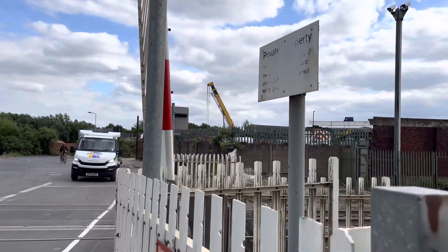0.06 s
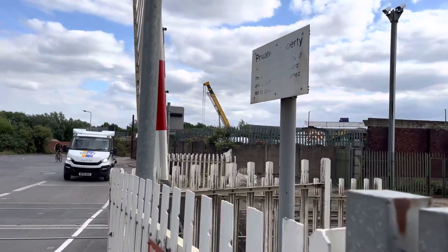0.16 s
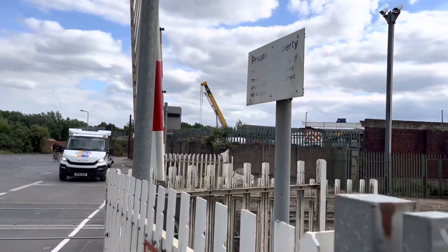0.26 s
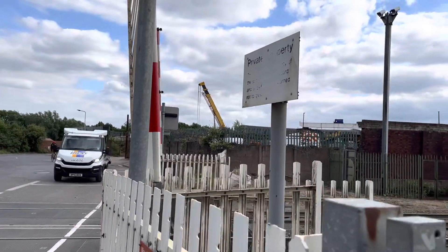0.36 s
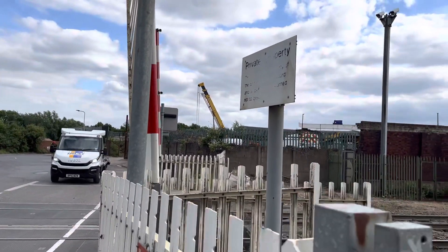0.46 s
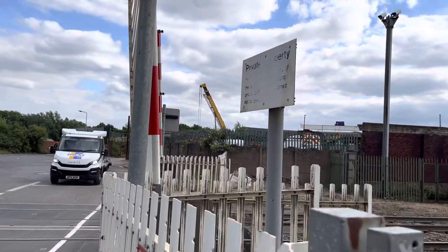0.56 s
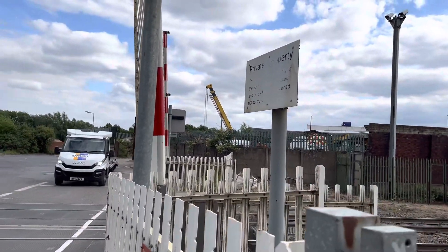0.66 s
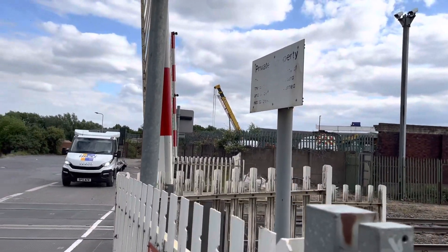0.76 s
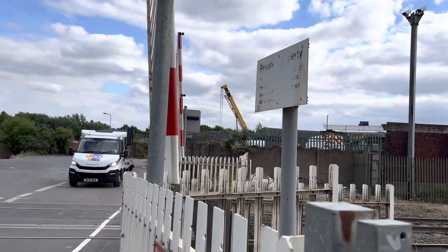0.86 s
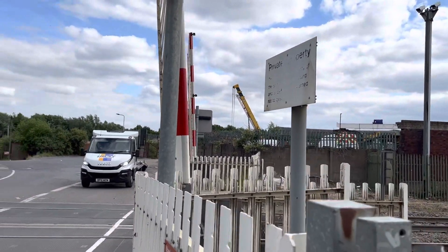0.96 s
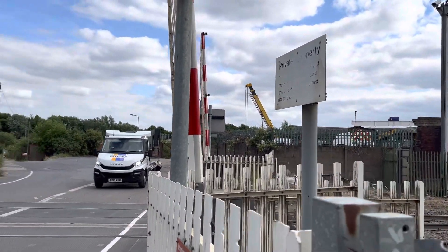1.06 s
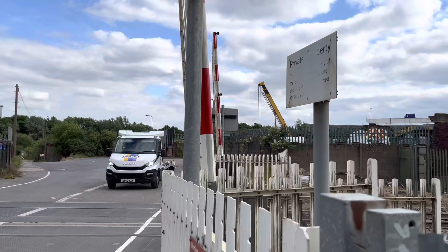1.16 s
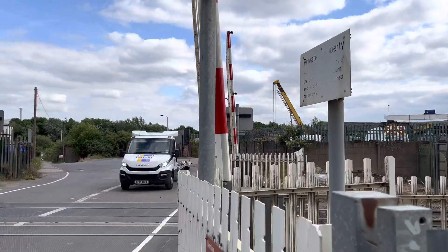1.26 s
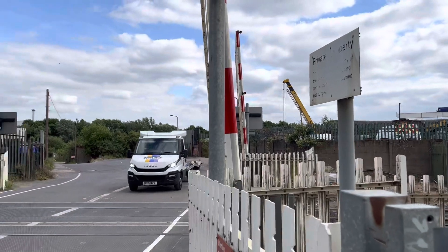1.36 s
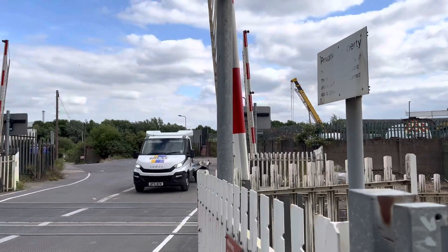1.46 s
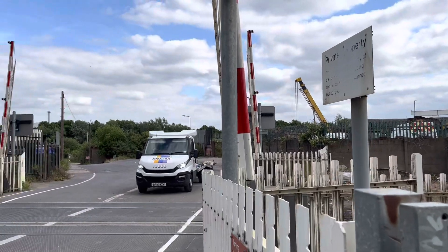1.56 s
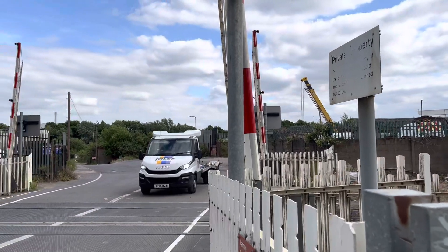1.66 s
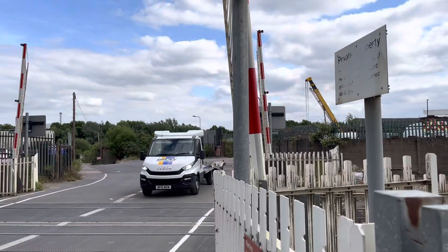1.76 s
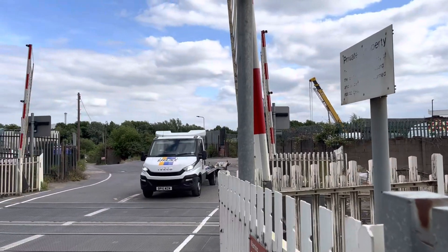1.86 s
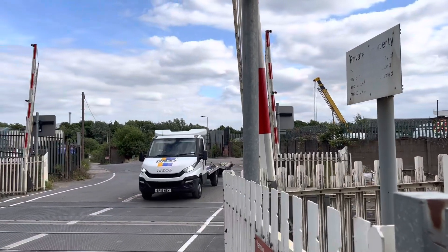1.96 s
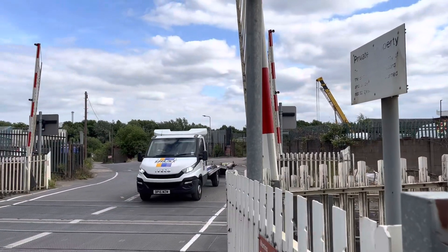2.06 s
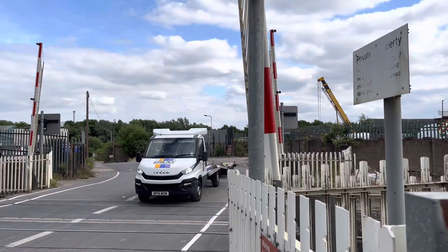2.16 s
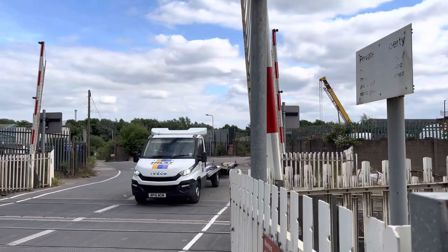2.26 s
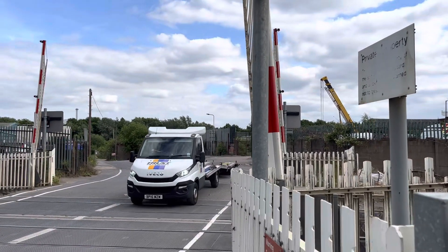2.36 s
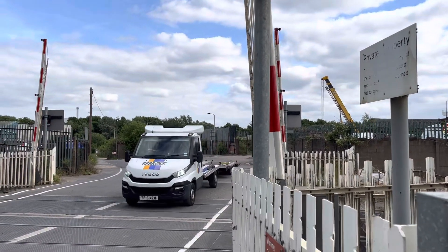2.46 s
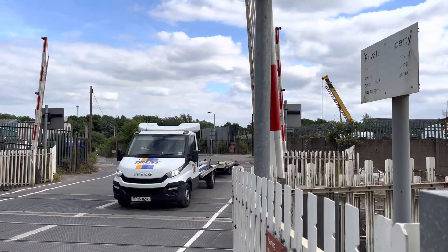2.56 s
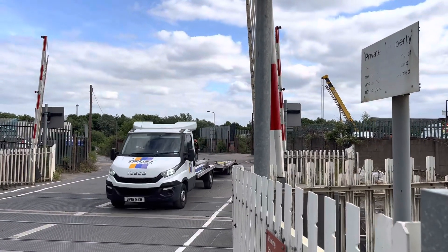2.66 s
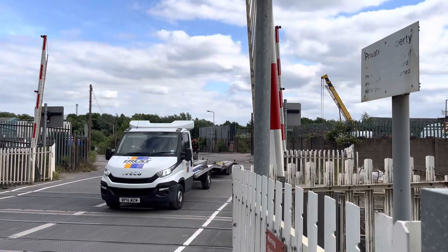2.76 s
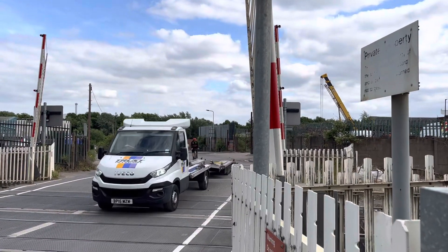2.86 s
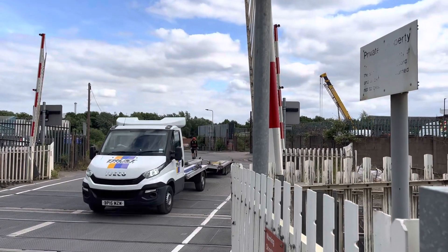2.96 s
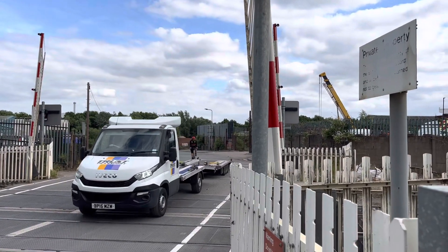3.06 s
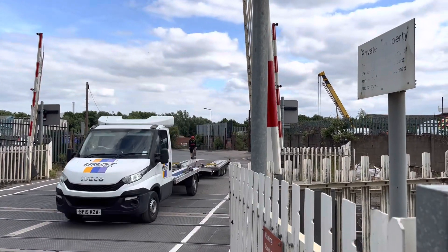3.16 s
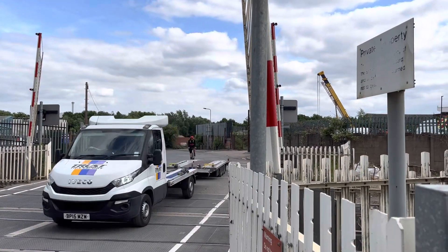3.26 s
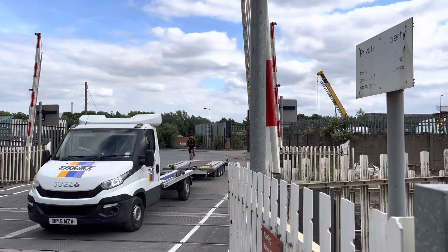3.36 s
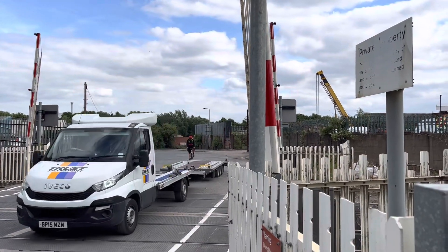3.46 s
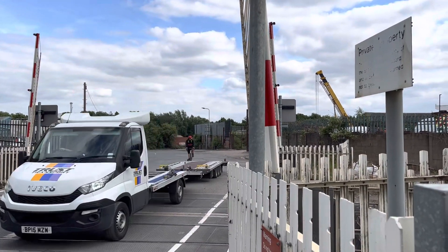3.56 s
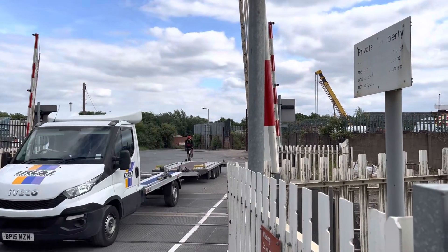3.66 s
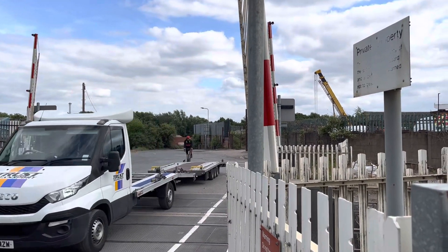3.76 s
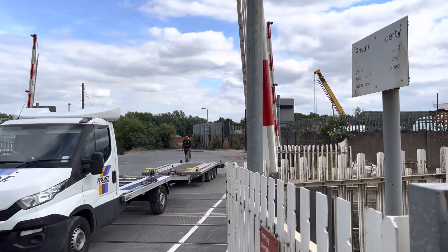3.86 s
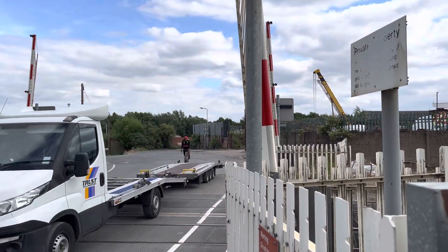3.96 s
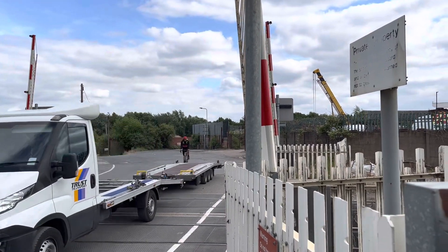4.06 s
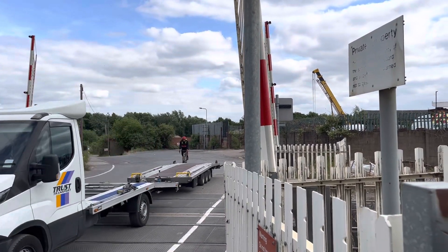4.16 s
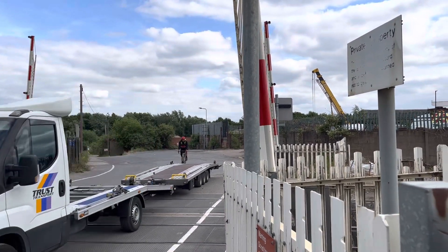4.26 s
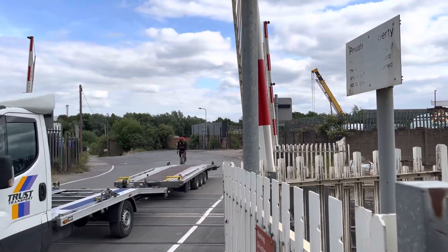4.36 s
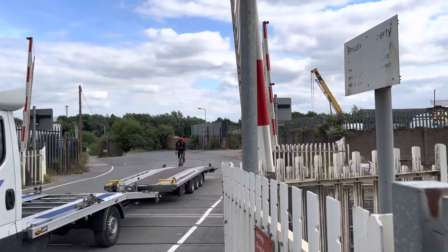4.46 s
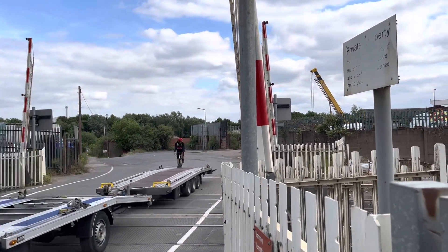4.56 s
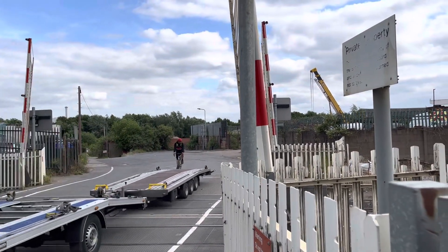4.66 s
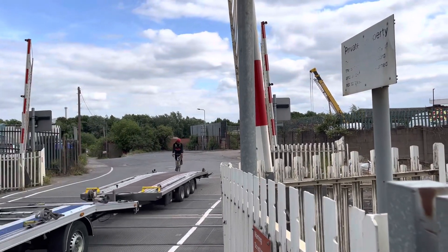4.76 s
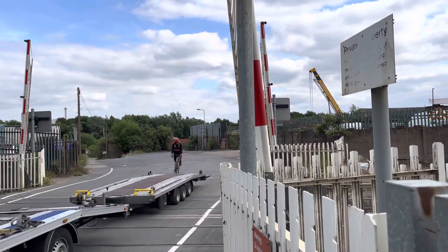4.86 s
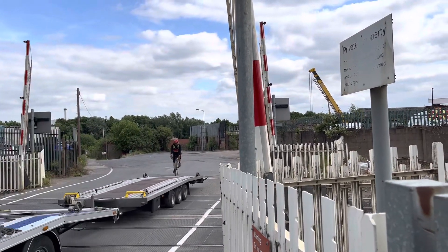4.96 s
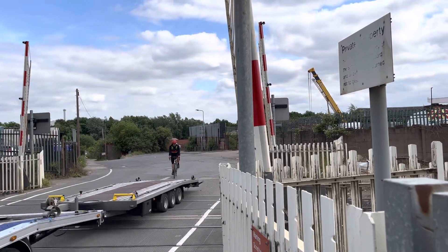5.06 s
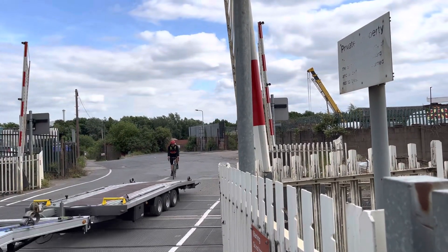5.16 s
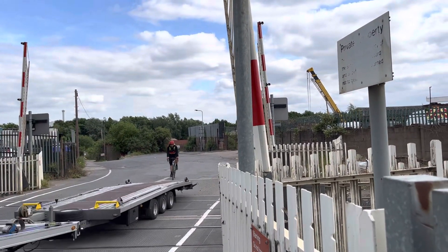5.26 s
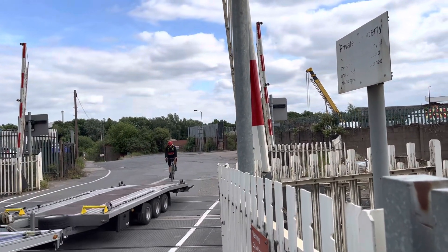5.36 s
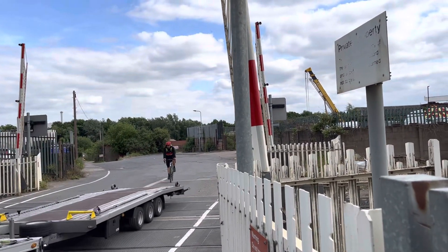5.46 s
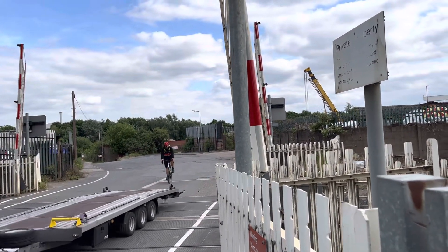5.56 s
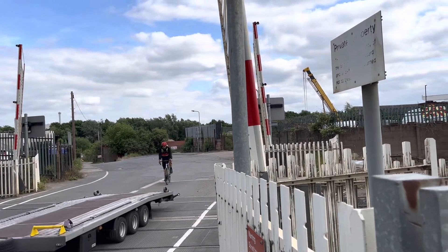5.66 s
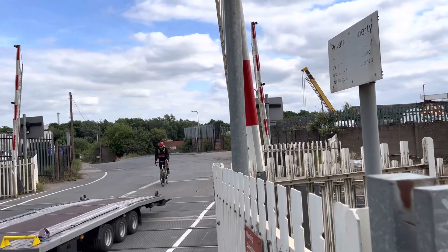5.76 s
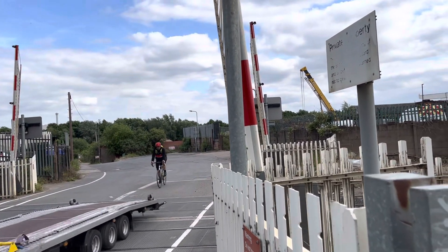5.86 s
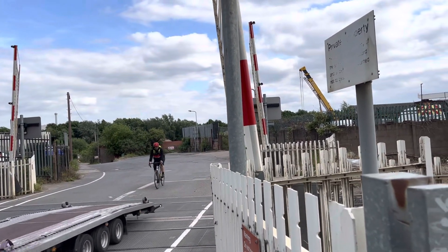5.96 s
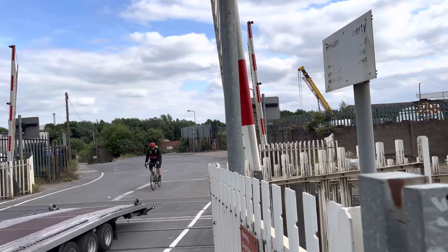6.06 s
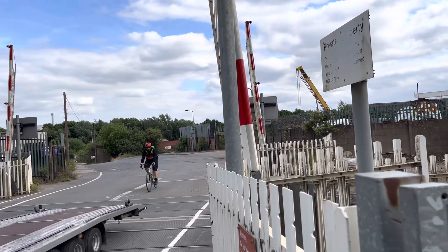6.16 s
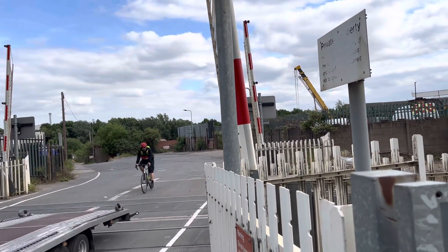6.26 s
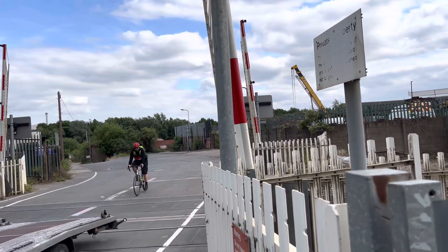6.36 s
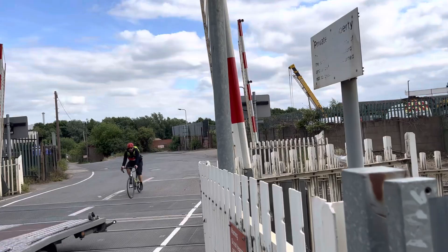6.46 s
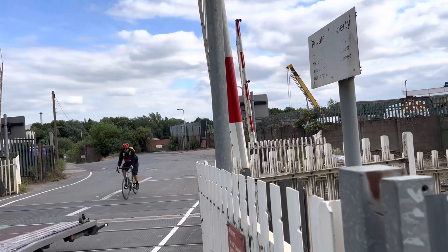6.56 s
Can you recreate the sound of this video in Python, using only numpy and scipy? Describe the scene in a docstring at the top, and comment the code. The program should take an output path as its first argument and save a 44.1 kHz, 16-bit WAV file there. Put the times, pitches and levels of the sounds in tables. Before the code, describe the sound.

A close stereo roadside perspective in open air. At first there is only quiet, throbbing low rumble and a faint far wash of traffic. A few dull knocks with light rattling follow, then a short lull before the diesel van growls past. Its empty trailer bounces over the rails with rapid irregular bangs, hollow body knocks, loose ramps clattering and small fittings jingling, easing only slightly as the tail goes by.

```python
"""A diesel van tows an empty flatbed trailer over a level crossing and passes close to the microphone.
First come a low, throbbing rumble of breeze and exhaust, firing pulses and far traffic, all shaped noise
and tones, and a soft hum. From 1.1 s jolts thump the deck and set the steel chattering: damped bursts and
random contacts that excite ringing modes. From about 4 s the van, then the trailer, are alongside:
tyre roar, loose ramps and fittings are loudest, by distance and by rough deck."""
import sys
import numpy as np
from scipy import signal
from scipy.fft import rfft, irfft, next_fast_len
from scipy.io import wavfile
from scipy.ndimage import map_coordinates

SR = 44100
rng = np.random.default_rng(int(sys.argv[2]) if len(sys.argv) > 2 else 0)


def master_out(mix):
    """Clip the mix to full scale and print it as 16-bit PCM to the path in sys.argv[1]."""
    frames = np.transpose(np.atleast_2d(mix))
    ceiling = np.clip(frames, -1, 1)
    pcm = np.round(ceiling * 32767).astype(np.int16)
    wavfile.write(sys.argv[1], SR, pcm)


N = 290619
TIME = np.arange(N) / SR

# the drive past: speed, distance of the lane, and the times between which each is alongside
SPEED_M_PER_S, LANE_M = 4.71, 1.79
WHEELS_ALONGSIDE_S, STEEL_ALONGSIDE_S = (4.2, 5.87), (4.69, 6.27)

# engine before its drift: [t/s, firing rate f/Hz, level/dB]
ENGINE_CURVE = [(0, 74, -43), (1.3, 79, -38.5), (2.6, 66, -41.5), (3.2, 90, -28.5), (3.9, 78, -29.5),
                (4.4, 63, -37), (6.59, 48, -44)]
# spectrum of tyre roar and far traffic: [f/Hz, relative level/dB per Hz]
TYRE_SPECTRUM = [(40, -16.5), (130, 3.5), (250, 4), (400, 0.5), (700, 0.5), (1000, -3.5), (1500, -4.5),
                 (3000, -17.5), (6000, -26), (14000, -53)]
# spectrum of the loose steel: [f/Hz, relative level/dB per Hz]
STEEL_SPECTRUM = [(100, -3), (300, -2.5), (700, -6), (1300, 1), (1900, 0.5), (2400, -4), (3200, -2.5),
                  (4500, -8.5), (6000, -11), (7300, -16.5), (8600, -21), (9700, -14.5), (11000, -22),
                  (13500, -23.5), (15000, -55)]
# wheels hitting rails and panel edges, levels before each layer's trim: [t/s, thump level/dB,
# deck knock f/Hz, clank level/dB, time for the clatter to build/s, settling t60/s]
WHEEL_JOLTS = [(1.123, -24, 604, -31, 0.0096, 0.5), (1.718, -23, 636, -27, 0.0041, 0.68),
               (1.888, -22, 924, -33, 0.0055, 0.83), (1.966, -20, 325, -26, 0.0038, 0.83),
               (2.216, -20, 480, -30, 0.0082, 0.96), (3.209, -32, 513, -29, 0.008, 0.26),
               (3.362, -19, 586, -35, .004, .12), (3.402, -13.5, 437, -18, 0.0021, .17),
               (3.464, -14.5, 752, -13, .0005, 0.081), (3.63, -15, 387, -18.5, 0.0036, 0.27),
               (3.759, -14, 302, -26, 0.0053, 0.28), (4.047, -6, 528, -14.5, 0.005, 0.24),
               (4.089, -9.5, 491, -16.5, 0.005, 0.19), (4.16, -13.5, 607, -12, 0.00086, 0.15),
               (4.208, -14, 588, -9, 0.0015, 0.12), (4.284, -14, 510, -14.5, 0.001, 0.19),
               (4.335, -10.5, 734, -15, .001, 0.085), (4.471, -16, 508, -39, 0.00091, 0.05),
               (4.537, -10.5, 411, -17, 0.0012, 0.29), (4.613, -14, 510, -10.5, 0.0018, 0.089),
               (4.644, -11.5, 602, -11, 0.003, 0.21), (4.72, -11.5, 484, -8.5, 0.006, 0.47),
               (4.743, -16, 520, -5.5, 0.0043, 0.29), (4.774, -11, 446, -13, 0.0023, 0.1),
               (4.812, -11.5, 504, -26, 0.0045, 0.09), (4.869, -11, 376, -6, 0.003, 0.18),
               (4.898, -12, 400, -6.5, 0.0037, 0.42), (4.939, -12, 665, -28, 0.0062, 0.17),
               (4.989, -22, 417, -5, 0.0069, 0.054), (5.079, -20, 470, -6, 0.0062, 0.12),
               (5.11, -10, 409, -23, .003, 0.086), (5.188, -38, 450, -17.5, 0.0056, 0.54),
               (5.24, -36, 503, -13, 0.0037, 0.22), (5.351, -18.5, 400, -15.5, .008, 0.17),
               (5.487, -17, 578, -14, 0.0046, 0.33), (5.523, -11, 556, -27, 0.0028, 0.25),
               (5.608, -12.5, 704, -6.5, 0.0049, 0.3), (5.64, -11, 487, -10, 0.0058, 0.093),
               (5.825, -15, 530, -7.5, 0.026, 0.12), (5.955, -16, 525, -8.5, 0.0066, 0.19),
               (6.048, -18, 495, -17, 0.0039, 0.52), (6.127, -21, 335, -15, 0.0017, 0.34),
               (6.193, -15.5, 463, -16, 0.0045, 0.59), (6.263, -20, 557, -11, 0.0021, 0.3),
               (6.3, -23, 512, -15, 0.0087, 0.28), (6.37, -21, 500, -10, 0.036, 0.26),
               (6.537, -30, 188, -32.5, 0.0014, 0.42)]


def amp(db):
    """Decibels to gain."""
    return 10 ** (np.asarray(db) / 20)


def unit(x):
    """Scales to rms 1."""
    return x / np.sqrt(np.mean(x ** 2) + 1e-20)


def along(rows):
    """The columns of a curve at every sample."""
    s, *columns = np.transpose(rows)
    return [np.interp(TIME, s, c) for c in columns]


def across(rows, hz):
    """The columns of a spectrum at the given frequencies, read on a logarithmic scale."""
    f, *columns = np.transpose(rows)
    return [np.interp(np.log(hz + 1), np.log(f), c) for c in columns]


def add(mix, s, sound):
    """Mixes a two-channel sound in at time s."""
    part = mix[:, max(round(s * SR), 0):][:, :sound.shape[1]]
    part += sound[:, :part.shape[1]]


def white(size=N):
    """Two independent channels of white noise."""
    return rng.standard_normal((2, size))


def coloured(x, spectrum, size=4096):
    """Causal minimum-phase filter with the given spectrum; white noise keeps its power."""
    hz = abs(np.fft.fftfreq(size, 1 / SR))
    log_gain = np.log(unit(amp(across(spectrum, hz)[0])))
    taps = np.fft.ifft(np.exp(np.conj(signal.hilbert(log_gain)))).real
    return signal.oaconvolve(x, taps[None, :size // 2], axes=1)[:, :x.shape[1]]


def drift(rate_hz):
    """Slow random wander of rms 1, mostly below rate_hz."""
    size = next_fast_len(N)
    hz = np.fft.rfftfreq(size, 1 / SR)
    smoothed = rfft(rng.standard_normal(size)) / (1 + (hz / rate_hz) ** 4)
    return unit(irfft(smoothed, size)[:N])


def ringing(hz, half_width_hz):
    """Two channels of noise held in one narrow resonance, rms 1."""
    f = np.fft.rfftfreq(N, 1 / SR)
    return unit(irfft(rfft(white()) / (1 + ((f - hz) / half_width_hz) ** 2), N))


def impacts(length, per_s, spread_db):
    """Random contacts of either sign, mostly small, a few large."""
    sizes = amp(spread_db * np.minimum(rng.exponential(1, length), 3.5))
    signs = rng.choice([-1, 1], length)
    return sizes * signs * (rng.random(length) < per_s / SR)


def distance(t, alongside_s):
    """Metres from the microphone to the nearest part of a long vehicle driving past."""
    return np.hypot(LANE_M, SPEED_M_PER_S * (t - np.clip(t, *alongside_s)))


def swell(start, end, attack_s, release_s):
    """A gain that rises to 1 at start, holds until end and dies away."""
    return np.exp(-np.maximum(start - TIME, 0) / attack_s - np.maximum(TIME - end, 0) / release_s)


def deck(attack_s=.05, release_s=.07):
    """Gains of tyre roar and of steel shaking: 1 on smooth road, more on each rough stretch."""
    # rough deck under the wheels: [start t/s, end t/s, extra roar level/dB, extra shaking level/dB]
    rough_stretches = [(1.126, 1.634, 2.5, -13), (1.872, 2.418, 8, 2.5), (3.328, 3.562, 9, 12.5),
                       (3.603, 3.754, 6.5, 8.5), (3.842, 4.06, -9, 5.5), (4.09, 4.33, -0.5, 3),
                       (4.634, 4.966, 3, 3.5), (5.092, 5.277, 0, 5.5), (5.788, 5.912, -7, 5),
                       (6.272, 6.408, 3.5, 10)]
    power = 1
    for start, end, roar_db, shake_db in rough_stretches:
        extra = amp([[roar_db], [shake_db]]) * swell(start, end, attack_s, release_s)
        power = power + extra ** 2
    return np.sqrt(power)


def rumble(breeze_db=-1.5, lumpy_db=4.5, drone_db=-2.0, throb_db=0.5):
    """Lumpy breeze on the microphone, and the drone of the van's exhaust and body, as low noise."""
    # spectra of breeze and drone: [f/Hz, relative level/dB per Hz]
    breeze_spectrum = [(15, -56), (28, -62), (42, -0.5), (58, 3.5), (75, -14.5), (100, -6.5), (200, -37),
                       (1200, -77)]
    drone_spectrum = [(30, -15), (55, -27.5), (78, 5.5), (105, -0.5), (150, -3.5), (220, -10), (400, -28),
                      (1200, -68)]
    # breeze, and the drone that is strongest as the van's flank comes by, before trim: [t/s, level/dB]
    breeze_curve = [(0, -32), (2.05, -27.5), (2.35, -26.5), (2.95, -29.5), (3.4, -26.5), (4.3, -24),
                    (5.3, -33), (5.8, -29), (6.59, -38)]
    drone_curve = [(0, -33), (2.1, -35), (3.0, -28), (3.55, -26), (3.7, -20.5), (3.98, -17.5), (4.4, -27.5),
                   (4.9, -30), (5.4, -31.5), (6.59, -31.5)]
    breeze = unit(coloured(white(), breeze_spectrum))
    drone = unit(coloured(white(), drone_spectrum))
    breeze_gain = amp(along(breeze_curve)[0] + breeze_db + lumpy_db * drift(8.2))
    drone_gain = amp(along(drone_curve)[0] + drone_db + throb_db * drift(15.0))
    return breeze * breeze_gain + drone * drone_gain


def engine(clatter=0.49, burst_turns=1.0, whine_db=-2, whistle_db=-59):
    """Each firing gives an exhaust pulse and a burst of diesel clatter; a whine and faint whistle ride on top."""
    # spectrum of the clatter: [f/Hz, relative level/dB per Hz]
    clatter_spectrum = [(30, -9), (70, -7), (150, -6), (280, 0.5), (400, -15.5), (700, -8.5), (1400, -18.5),
                        (2200, -41), (3000, -19), (5000, -39), (14000, -45)]
    # thin whine from the front of the van, before waver and trim: [t/s, f/Hz, level/dB]
    whine_curve = [(0, 947, -68), (1.0, 980, -50.5), (2.4, 978, -53), (2.98, 992, -45), (3.08, 990, -39.5),
                   (3.2, 990, -41.5), (3.25, 990, -36), (3.31, 988, -43), (3.9, 984, -33.5),
                   (4.3, 960, -59)]
    firing_hz, db = along(ENGINE_CURVE)
    turns = np.cumsum(firing_hz * (1 + 0.041 * drift(7.2))) / SR  # one turn per firing
    pulses = sum(np.cos(2 * np.pi * k * turns) / k ** 2 for k in range(1, 6))
    bursts = (0.4 + np.exp(-(turns % 1) / burst_turns)) * white()
    diesel = .5 * unit(pulses) + clatter * unit(coloured(bursts, clatter_spectrum))

    pitch_hz, tone_db = along(whine_curve)
    waver, flicker_db = 1 + .015 * drift(60), 4 * drift(25)
    whine = unit(np.sin(2 * np.pi * np.cumsum(pitch_hz * waver) / SR))
    whistle = ringing(hz=2975, half_width_hz=84) * amp(whistle_db + 4.1 * drift(22))
    return amp(db) * diesel + amp(tone_db + whine_db + flicker_db) * whine + whistle


def engine_tones(level_db=-1.0, weave_db=2.5):
    """A few harmonics of the firing rate, with a drift of their own, weave in and out of the rumble."""
    # faint clean tones, before weave and trim: [multiple of the firing rate, level/dB]
    harmonics = [(2, -61), (4, -48), (7, -48), (8, -51.5), (10, -56)]
    turns = np.cumsum(along(ENGINE_CURVE)[0] * (1 + .012 * drift(5))) / SR
    tones = 0
    for k, db in harmonics:
        tones = tones + amp(db + weave_db * drift(3.5)) * np.sin(2 * np.pi * k * turns)
    fade_in_db = np.interp(TIME, [0, 1.6], [-7, 0])
    return tones * amp(level_db + fade_in_db)


def traffic(level_db=-42):
    """A steady wash of far traffic: noise with the colour of tyre roar."""
    return amp(level_db) * unit(coloured(white(), TYRE_SPECTRUM))


def tyres(smooth_at_1m_db=-21, flutter_db=-1.04, grit=0.53):
    """Tread roar that flutters on the uneven deck, with grit crunching under it."""
    crunch = unit(impacts(N, per_s=900, spread_db=2.0))
    tread = unit(coloured(white() + grit * crunch, TYRE_SPECTRUM))
    level = amp(smooth_at_1m_db + flutter_db * drift(29)) / distance(TIME, WHEELS_ALONGSIDE_S)
    return tread * deck()[0] * level


def steel_blow(crack_t60, ring_db, size=8192):
    """One contact on two channels: a dense crack, and steel modes randomly weighted as by where it lands."""
    # ringing of the steel bed and ramps, before detuning: [f/Hz, level/dB, t60/s]
    steel_modes = [(565, 6.5, 0.085), (732, 11.5, 0.064), (1170, -9, 0.031), (1733, 6, 0.07),
                   (1907, 4, 0.075), (2134, 4, 0.095), (2350, 5, 0.06), (2560, 6.5, 0.085),
                   (2800, 6, 0.063), (3015, -2, 0.088), (3370, -6, 0.24), (3974, 4, 0.19),
                   (4540, 8.5, 0.07), (6580, 10, 0.09), (7330, 14, 0.075)]
    t = np.arange(size) / SR
    crack = white(size) * amp(-60 * t / crack_t60)
    hz, db, t60 = np.transpose(steel_modes)[:, :, None]
    detune = 1 + .035 * rng.standard_normal(hz.shape)
    weights = white(len(steel_modes)) + 1j * white(len(steel_modes))  # random level and phase
    modes = amp(db - 60 * t / t60) * np.exp(2j * np.pi * hz * detune * t)
    return unit(crack) + amp(ring_db) * unit((weights @ modes).real)


def passing(x):
    """The ringing wanders in pitch as the parts shift, and sinks with the Doppler effect as they go by."""
    metres = np.hypot(LANE_M, SPEED_M_PER_S * (TIME - np.mean(STEEL_ALONGSIDE_S)))
    wander = np.cumsum(.02 * drift(7))
    at = (TIME - metres / 343) * SR + wander  # speed of sound 343 m/s
    return np.array([map_coordinates(channel, [at], order=3, mode="mirror") for channel in x])


def coloured_by_air(x, corner_hz=5500, far_db=-9):
    """Far down the road the steel sounds duller; the treble opens as the van draws near."""
    low = signal.lfilter(*signal.butter(1, corner_hz, fs=SR), x)
    return low + (x - low) * amp(np.interp(TIME, [2.5, 5], [far_db, 0]))


def rattle(smooth_at_1m_db=-24, flutter_db=1.0, count=12):
    """Several loose fittings buzz against the frame in random contacts, harder on rough deck."""
    parts = 0
    for _ in range(count):
        contacts = impacts(N, per_s=110, spread_db=3.4)
        blow = steel_blow(crack_t60=0.099, ring_db=-9.5)
        parts = parts + signal.oaconvolve(contacts[None], blow, axes=1)[:, :N]
    steel = unit(coloured(passing(parts), STEEL_SPECTRUM))
    level = amp(smooth_at_1m_db + flutter_db * drift(29)) / distance(TIME, STEEL_ALONGSIDE_S)
    return coloured_by_air(steel * deck()[1] * level)


def throbs(level_db=-4.0, half_length_s=0.027):
    """Short low tones of a few gliding cycles swell within the rumble."""
    # throbs, before trim: [middle t/s, f/Hz at the middle, level/dB]
    throb_events = [(.11, 65.7, -22), (.46, 64.4, -16.5), (.58, 74, -20.5), (.98, 78, -16),
                    (1.25, 72.8, -15), (1.54, 60.3, -17), (2.289, 64, -16.5), (2.422, 62.7, -15),
                    (2.424, 159, -25), (2.481, 52.2, -14), (2.619, 65, -12.5), (2.62, 145, -21.5),
                    (3.658, 89.4, -13), (3.88, 83, -10), (5.15, 81, -18), (5.741, 69.6, -16.5),
                    (6.47, 252.4, -22), (6.565, 149.3, -19.5)]
    out, t = np.zeros((2, N)), np.arange(SR // 5) / SR
    middle = t.mean()
    for s, hz, db in throb_events:
        glide = rng.uniform(-4, 4) * (t - middle) ** 2
        wave = np.sin(2 * np.pi * (hz * (t + glide) + rng.random((2, 1))))
        envelope = np.exp(-((t - middle) / half_length_s) ** 2)
        add(out, s - middle, amp(db + level_db) * wave * envelope)
    return out


def hum(hz=277, level_db=-39, start_s=0.292, end_s=0.5):
    """One soft, far-off low tone, a very narrow band of noise, swells and fades."""
    gain = amp(level_db) * swell(start_s, end_s, attack_s=0.036, release_s=0.06)
    return ringing(hz, half_width_hz=1.56) * gain


def thumps(level_db=-5.5, knock=.75, t60=.12, size=16384):
    """A tyre slaps an edge: a dull burst, and the deck panel knocks in a few damped modes."""
    # spectrum of the slap: [f/Hz, relative level/dB per Hz]
    slap_spectrum = [(40, -36), (110, 3), (300, 4.5), (500, 5), (800, -1.5), (1250, -5.5), (2000, -10.5),
                     (4000, -35), (12000, -44)]
    out, t = np.zeros((2, N)), np.arange(size) / SR
    # panel modes: multiple of the knock's pitch, gain
    ratio, gain = np.transpose([(.62, .5), (1, 1), (1.27, .6), (1.7, .5), (2.3, .4)])
    envelope = amp(-60 * t / t60)
    for s, db, hz, *_ in WHEEL_JOLTS:
        slap = coloured(white(size) * envelope, slap_spectrum)
        modes_hz = hz * ratio * rng.uniform(.95, 1.05, len(ratio))
        signed_gain = gain * rng.choice([-1, 1], (2, len(gain)))
        panel = signed_gain @ np.sin(2 * np.pi * modes_hz[:, None] * t) * envelope
        thump = unit(unit(slap) + knock * unit(panel)) * np.sqrt(np.mean(envelope ** 2))
        add(out, s, amp(db + level_db) * thump)
    return out


def clanks(level_db=-7.0, hold_share=0.042, ring_db=-5, size=22050, count=3):
    """A jolt throws a few loose parts against the bed together; each chatters on its own and settles."""
    bright_db, dulling_per_db = -2, 0.5  # light clanks are bright, heavy ones duller
    out, t = np.zeros((2, N)), np.arange(size) / SR
    for s, _, _, db, rise_s, t60 in WHEEL_JOLTS:
        # builds up, holds for a share of t60, then decays
        settling = amp(-60 * np.maximum(t / t60 - hold_share, 0)) * np.minimum(t / rise_s, 1)
        # a sudden clank is mostly its first blow
        first_blow, sound = np.exp(-rise_s / .004), 0
        for _ in range(count):
            chatter = impacts(size, per_s=300, spread_db=2) * settling
            chatter[0] = first_blow * np.linalg.norm(chatter)
            blow = steel_blow(crack_t60=.025, ring_db=ring_db)
            sound = sound + signal.fftconvolve(chatter[None], blow, axes=1)[:, :size]
        # the clank's level as it would be at 1 m sets the tilt around 3 kHz
        force_db = db + 20 * np.log10(distance(s, STEEL_ALONGSIDE_S))
        tilt_db = bright_db - dulling_per_db * force_db
        tilted = [(hz, level + tilt_db * np.log(hz / 3000)) for hz, level in STEEL_SPECTRUM]
        clank = unit(coloured(sound, tilted)) * np.sqrt(np.mean(settling ** 2))
        add(out, s, amp(db + level_db) * clank)
    return coloured_by_air(out)


def jingles(level_db=-2, rise_s=.004, ring_t60=.011, size=22050, count=40):
    """Small steel fittings bounce, each ringing in its own dense cluster of modes."""
    # small hooks and shackles, before trim: [t/s, f/Hz, spread of modes as a share of f, level/dB, t60/s]
    jingle_events = [(1.135, 4370, .22, -38, 0.35), (1.595, 3100, 0.52, -40.5, 0.36),
                     (1.757, 4240, 0.18, -33.5, 0.22), (1.966, 8900, 0.17, -40, 0.29),
                     (3.851, 6800, 0.13, -33, 0.29), (4.648, 4700, 0.33, -15.5, .088),
                     (5.03, 5000, 0.073, -29, 0.39), (5.345, 4830, .12, -20, 0.058),
                     (5.493, 6830, 0.14, -25, .3), (5.960, 10540, 0.15, -22.5, 0.15),
                     (6.126, 10800, 0.26, -23, 0.14), (6.531, 10500, 0.21, -26.5, .093)]
    out, t = np.zeros((2, N)), np.arange(size) / SR
    brief = t[:1024]
    for s, hz, spread, db, t60 in jingle_events:
        settling = amp(-60 * t / t60) * np.minimum(t / rise_s, 1)
        modes_hz = hz * (1 + spread * rng.uniform(-0.96, 1, (count, 1)))
        ring = white(count) @ np.sin(2 * np.pi * modes_hz * brief) * amp(-60 * brief / ring_t60)
        bounces = impacts(size, per_s=2000, spread_db=1.2) * settling
        sound = signal.fftconvolve(bounces[None], ring, axes=1)[:, :size]
        add(out, s, amp(db + level_db) * unit(sound) * np.sqrt(np.mean(settling ** 2)))
    return out


def clonks(level_db=-3, spread=0.019, rise_s=0.0033, body_t60=0.078, size=8192):
    """The suspension hits its stops: the body gives one compact, hollow note, the chassis rings briefly."""
    # hollow ringing of chassis and axles, before detuning: [f/Hz, level/dB, t60/s]
    chassis_modes = [(487, -3, 0.037), (722, -5, 0.24), (1027, -4, 0.08), (1140, -2.5, 0.16),
                     (1271, 3, 0.097)]
    # knocks against the chassis: [t/s, ring level/dB before trim, hollow body f/Hz, body level/dB]
    clonk_events = [(1.719, -27, 571, -21.5), (3.362, -22, 575, -21), (3.463, -18, 730, -19),
                    (3.757, -22, 307, -27), (4.049, -11, 513, -9.5), (4.091, -26, 490, -13),
                    (4.161, -30, 580, -11.5), (4.208, -25, 747, -8.5), (4.285, -15.5, 508, -26),
                    (4.470, -32, 529, -8.5), (4.538, -17, 395, -18), (4.649, -16, 371, -10.5),
                    (4.783, -10.5, 484, -22), (5.111, -17.5, 470, -8), (5.268, -17, 498, -26)]
    out, t = np.zeros((2, N)), np.arange(size) / SR
    hz, db, t60 = np.transpose(chassis_modes)[:, :, None]
    # body modes: multiple of its pitch, gain
    ratio, gain = np.transpose([(.6, .35), (1, 1), (1.17, .3)])
    for s, ring_db, hollow_hz, hollow_db in clonk_events:
        detune = 1 + spread * rng.standard_normal(hz.shape)
        turns = hz * detune * t + rng.random((2, len(chassis_modes), 1))
        ring = (amp(db - 60 * t / t60) * np.sin(2 * np.pi * turns)).sum(1)
        body_turns = hollow_hz * ratio[:, None] * t + rng.random((2, len(ratio), 1))
        body = gain @ np.sin(2 * np.pi * body_turns)
        sound = amp(ring_db + level_db) * ring + amp(hollow_db - 60 * t / body_t60) * body
        add(out, s, sound * (1 - np.exp(-t / rise_s)))
    return out


def ticks(t60=0.015, level_db=-7, size=2048):
    """Grit snaps out from under a tyre: a bright crack of noise with no ring."""
    # sharp ticks, before trim: [t/s, level/dB]
    tick_events = [(3.464, -16), (4.285, -18)]
    out, t = np.zeros((2, N)), np.arange(size) / SR
    for s, db in tick_events:
        crack = signal.lfilter(*signal.butter(1, 1500, "high", fs=SR), white(size))
        add(out, s, amp(db + level_db - 60 * t / t60) * crack)
    return out


def yard(x, t60=0.13, wet_db=-16, size=22050):
    """Fences and walls scatter a thin, short tail of sparse random echoes."""
    t = np.arange(size) / SR
    sparse = white(size) * (rng.random((2, size)) < .05)
    taps = sparse * (t > .012) * amp(-60 * t / t60)  # first echo after 12 ms
    return x + amp(wet_db) * signal.oaconvolve(x, taps / np.linalg.norm(taps[0]), axes=1)[:, :N]


def stereo_image(x, diffuse=1):
    """Level, phase and likeness of left and right by frequency; diffuse sound is less alike."""
    # stereo image: [f/Hz, coherence, left-right level/dB, phase lead of the right/rad]
    image_by_frequency = [(100, .93, 0, -.2), (450, .9, 1.2, -.55), (950, .54, 5, -1.05),
                          (1250, .6, 2, -1.3), (1560, .55, -1, -2.9), (1750, .9, 1.8, -.45),
                          (3200, .68, 7.2, -1.05), (5000, .62, 3.5, -.15), (5900, .62, 3, 1.3),
                          (7100, .62, 1.5, 1.6), (7800, .98, 0, 2.9), (9200, .99, 0, 3.4),
                          (10200, .62, 0, 4.8), (11100, .97, 0, 6.1), (13000, .97, 0, 6.5),
                          (14200, .5, 0, 9)]
    a, b = rfft(x)
    same, balance_db, phase = across(image_by_frequency, np.fft.rfftfreq(N, 1 / SR))
    same = np.clip(same, 0, 1) ** diffuse
    right = (same * a + np.sqrt(1 - same ** 2) * b) * np.exp(1j * phase)
    return irfft(np.array([a * amp(balance_db / 2), right * amp(-balance_db / 2)]), N)


def scene():
    """The van and trailer close by, in front of far traffic."""
    steady = rumble() + throbs() + engine() + engine_tones() + tyres() + rattle() + hum()
    knocks = thumps() + clonks() + clanks() + jingles() + ticks()
    return stereo_image(steady + yard(knocks)) + stereo_image(traffic(), diffuse=2.2)


def record(dry, ceiling=0.78, low_cut_hz=33, edge_hz=15000):
    """The deepest bass is cut and the loudest peaks are rounded off; then the treble ends at edge_hz."""
    dry = signal.sosfilt(signal.butter(4, low_cut_hz, "high", fs=SR, output="sos"), dry)
    rounded = dry / (1 + (dry / ceiling) ** 6) ** (1 / 6)
    band_limit = signal.firwin(511, edge_hz, window=("kaiser", 9), fs=SR)
    return signal.oaconvolve(rounded, band_limit[None], "same")


dry = scene()
out = record(dry)
master_out(out)
```